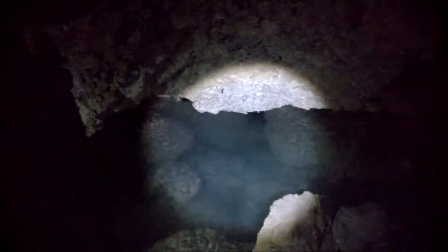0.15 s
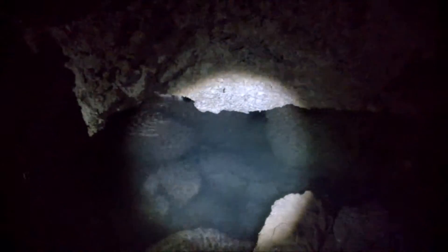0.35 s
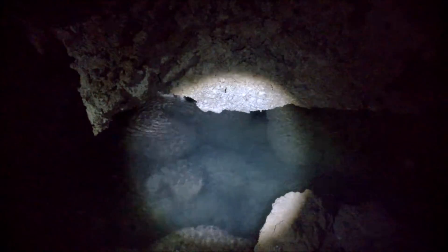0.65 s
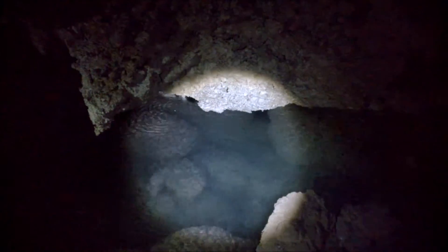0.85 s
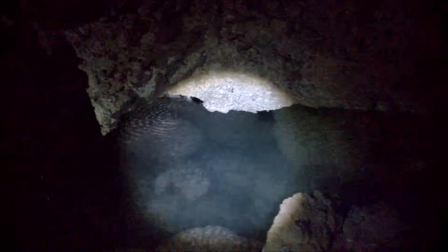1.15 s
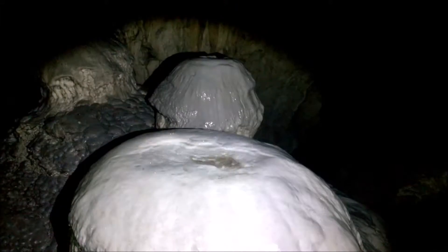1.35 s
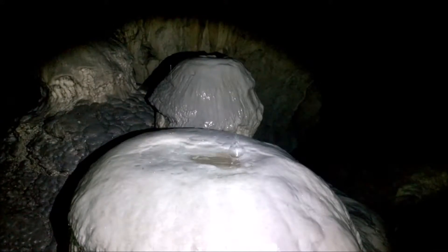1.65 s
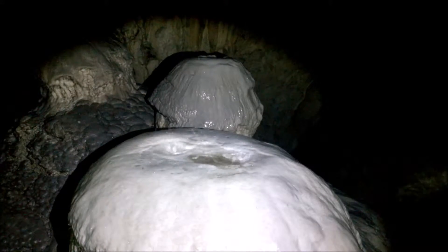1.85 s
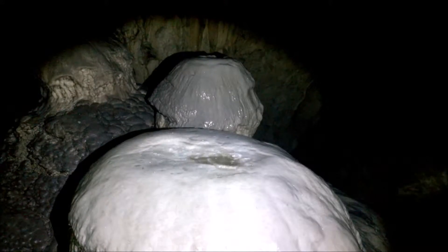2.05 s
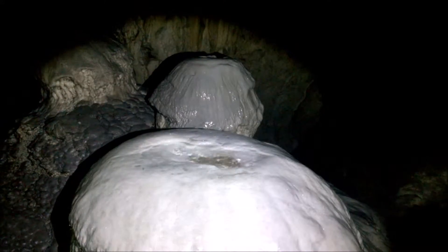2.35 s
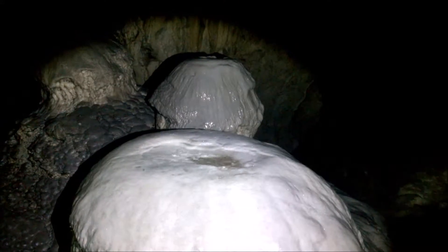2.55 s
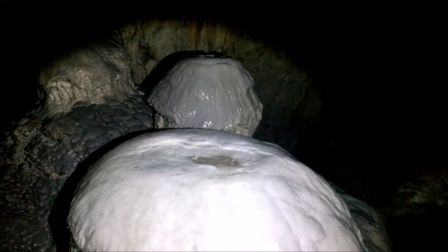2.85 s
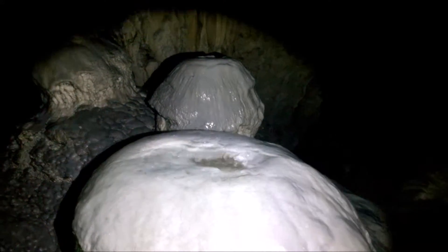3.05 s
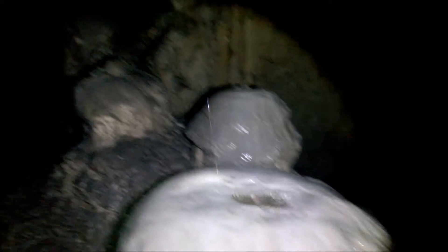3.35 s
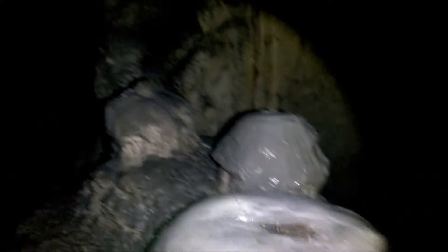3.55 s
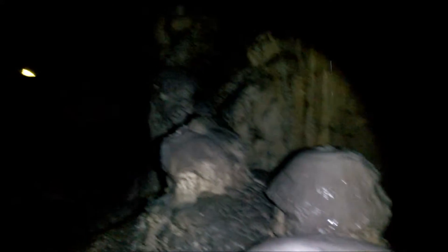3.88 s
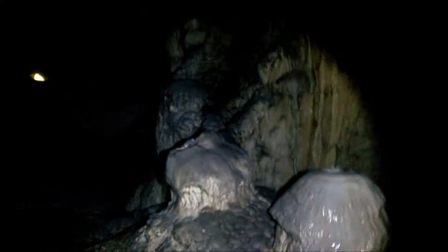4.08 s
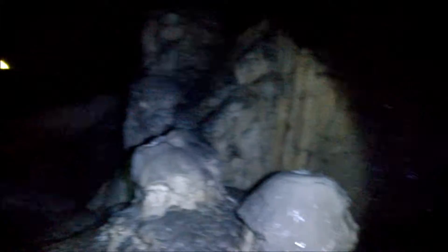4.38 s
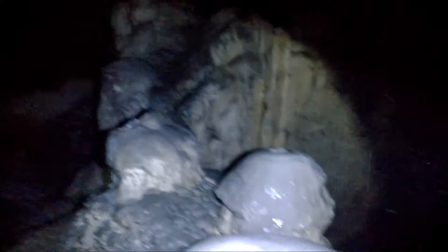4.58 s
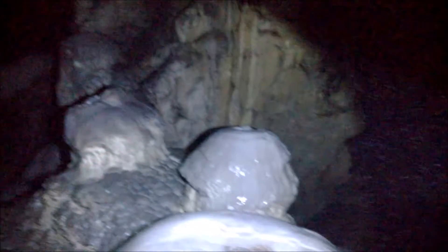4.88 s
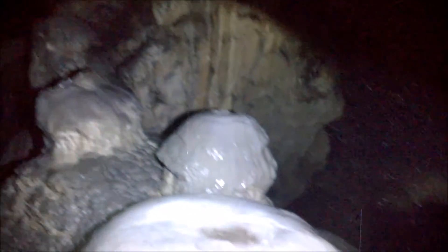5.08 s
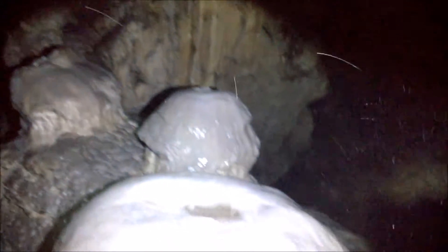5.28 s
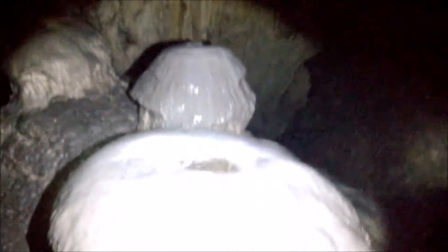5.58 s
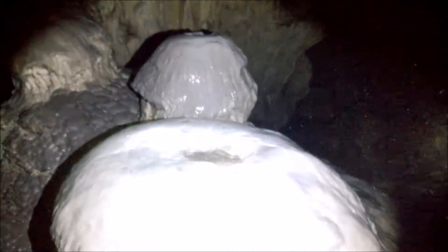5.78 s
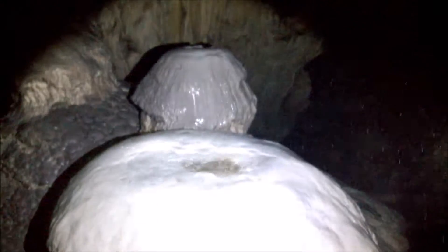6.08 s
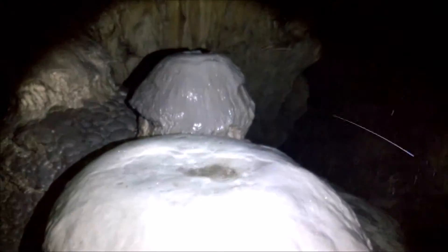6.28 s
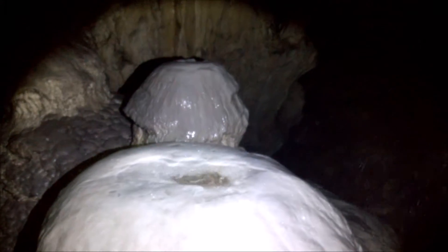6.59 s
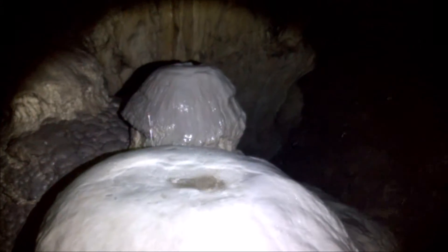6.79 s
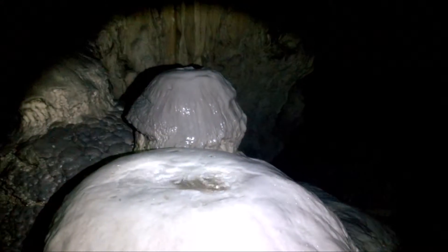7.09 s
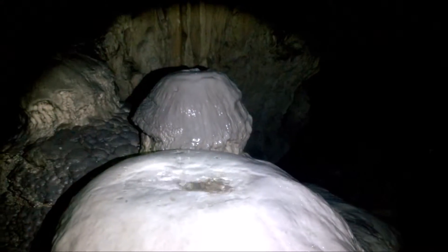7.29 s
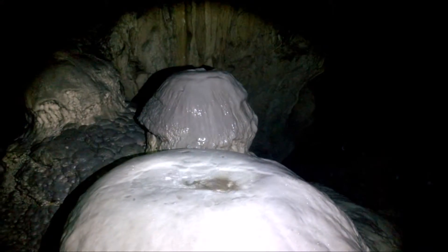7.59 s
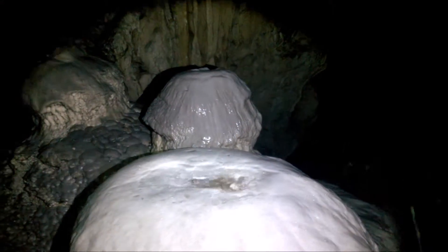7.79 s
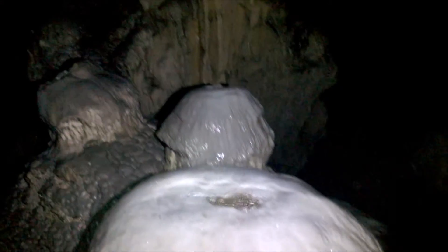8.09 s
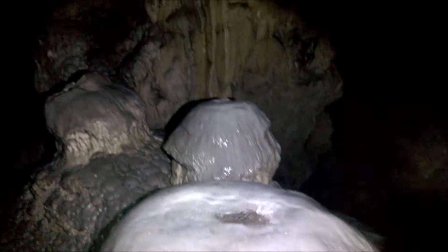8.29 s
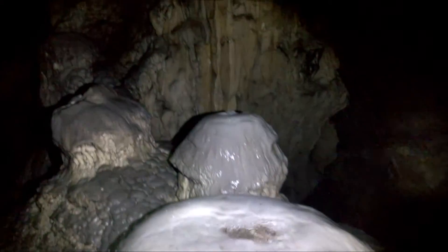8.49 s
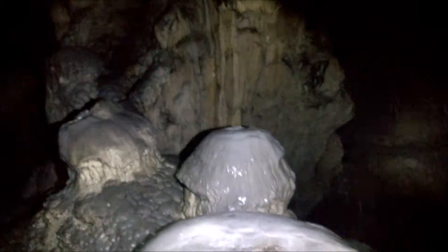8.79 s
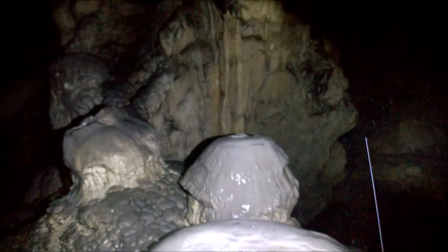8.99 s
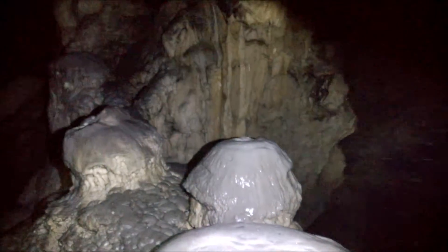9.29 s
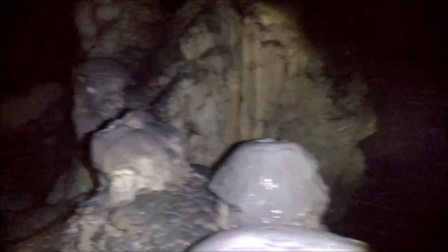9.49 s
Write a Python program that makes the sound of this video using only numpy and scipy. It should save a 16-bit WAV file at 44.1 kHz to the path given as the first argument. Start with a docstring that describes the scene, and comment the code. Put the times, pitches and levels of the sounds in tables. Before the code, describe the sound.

From 0 s a cave stream is already rushing over rocks: a fairly quiet, dense white-water hiss with fine crisp spray, gurgling bubbles and small trickles mostly blurred by short stone echoes. It grows about one decibel over the first half second, while a narrow treble band fills in. The water lies to the right of a handheld stereo pair, so the right side is much brighter and the left duller. At about 1.04 s the sound drops steeply into dead silence, until about 1.29 s. Then it returns abruptly, from beside a stalagmite, with noticeably softer spray and a rounder mid-range rush. It stays even to the end, around 9.5 s or later, with slight fluttering and a faintly heaving low rumble. Tiny splashing surges pass near 2.1 and 2.4 s, and a lower one near 5.4 s; a thin treble band fills in around 4 s.

```python
"""A stream rushes over rocks in a cave: white-water noise, countless ringing bubbles and fine spray.
The bubbles and spray are damped sines, mostly blurred by the echo of the stone walls.
It is heard first from beside a pool, then, after a moment of dead silence, from beside a stalagmite,
where the hiss is softer. The water lies to the right of the handheld microphone pair."""
import sys
import numpy as np
from scipy import signal
from scipy.fft import rfft, irfft, next_fast_len
from scipy.io import wavfile
from scipy.ndimage import uniform_filter1d, map_coordinates

SR = 44100
rng = np.random.default_rng(int(sys.argv[2]) if len(sys.argv) > 2 else 0)


def dump_mix(stems):
    """Bounce the given channels to the path in sys.argv[1] as a 16-bit WAV at rate SR."""
    frames = np.atleast_2d(stems).T  # one column per channel
    limited = np.clip(frames, -1, 1)  # hard clip at full scale
    pcm = np.round(limited * 32767).astype(np.int16)
    wavfile.write(sys.argv[1], SR, pcm)


N = 425105


def amp(db):
    """Decibels to gain."""
    return 10 ** (np.asarray(db) / 20)


def unit(x):
    """Scale to rms 1."""
    return x / np.sqrt(np.mean(x ** 2) + 1e-20)


def bell(x, centre, width):
    """A smooth bump of height 1."""
    return np.exp(-((x - centre) / width) ** 2)


def along(points, hz):
    """Each column after the frequency, read on a log axis."""
    f, *columns = np.transpose(points)
    return [np.interp(np.log(hz + 1), np.log(f + 1), column) for column in columns]


def filtered(x, response):
    """x times a complex response of frequency."""
    m = next_fast_len(N + SR // 2)
    hz = np.fft.rfftfreq(m, 1 / SR)
    return irfft(rfft(x, m) * response(hz), m)[..., :N]


def bubbles(count, low_hz, high_hz, cycles, spread_db, rise):
    """Damped sines at random moments; each climbs in pitch as its bubble nears the surface."""
    when, pitch, strength = rng.random((count, 3)).T[:, :, None]
    hz = low_hz + (high_hz - low_hz) * pitch ** 2  # big, low bubbles crowd closer in pitch
    k = np.arange(int(min(cycles * SR / low_hz, SR / 20)))  # samples, at most 1/20 s
    age = np.minimum(hz * k / SR / cycles, 1)  # 0 at birth, 1 when its cycles are spent
    gain = np.sqrt(hz) * amp(-spread_db * np.log(1 - .98 * strength))  # a few are much louder
    phase = 2 * np.pi * cycles * age * (1 + rise * age / 2)
    decay = np.exp(-np.log(100) * age) * (1 - age)
    ring = gain * np.sin(phase) * decay
    position = (when * N).astype(int) + k
    return unit(np.bincount(position.ravel(), ring.ravel(), N)[:N])


def cave(x, direct_db):
    """Two unrelated stone echoes of x, treble dying first, with a little direct sound on the right."""
    # how long the stone walls ring: pitch_hz, t60_s
    stone_decay = [(200, 0.91), (2000, 0.66), (12000, .25)]
    hz, t, z = signal.stft(rng.standard_normal((2, SR)), SR, nperseg=256)
    t60 = along(stone_decay, hz)[0][:, None]
    tail = signal.istft(z * amp(-60 * t / t60), SR, nperseg=256)[1]
    echo = unit(irfft(rfft(x) * rfft(tail, N), N))  # wraps round: the cave already rings at the start
    direct = np.array([np.zeros(N), x])
    return unit(echo + amp(direct_db) * direct)


def churn(x, patchy_db, flutter_db, smooth_hz):
    """The flow shifts between the rocks: bands swell and flutter, fine spray least; at times it surges."""
    # brief surges of splashing: centre_s, length_s, centre_hz, lift_db
    surges = [(2.14, .077, 2000, 4.5), (2.438, .055, 1300, 3), (5.4, 0.13, 620, 2.5)]
    hz, t, z = signal.stft(x, SR, nperseg=512)
    hz = hz[:, None]

    def field(bins, frames):
        """Random patches over pitch and time, rms 1."""
        noise = rng.standard_normal(z.shape[1:])
        return unit(uniform_filter1d(uniform_filter1d(noise, bins, 0), frames, 1))

    db = patchy_db * field(bins=5, frames=36) + flutter_db * field(bins=3, frames=5)
    db = db / np.sqrt(1 + hz / smooth_hz)  # full depth only in the bass
    for centre_s, length_s, centre_hz, lift_db in surges:
        band = bell(np.log2(hz + 1), np.log2(centre_hz), 0.44)  # width in octaves
        db = db + lift_db * bell(t, centre_s, length_s) * band
    return signal.istft(z * amp(db), SR, nperseg=512)[1][:, :N]


def heave(x, below_hz, depth_db, rate):
    """The deepest rumble comes and goes, following random points set rate times a second."""
    low = filtered(x, lambda hz: 1 / (1 + (hz / below_hz) ** 4))
    swell = map_coordinates(rng.standard_normal(400), [np.arange(N) * rate / SR], mode="mirror")
    return x + low * (unit(amp(depth_db * swell)) - 1)


def ports(x, spacing_m, alike, from_right):
    """Two microphone ports in a diffuse field share the bass; the right one hears it slightly earlier."""
    def likeness(hz):
        """The part of the right port's sound that the left port shares."""
        turn = 2 * np.pi * (hz + 1) * spacing_m / 343  # radians of phase across the pair
        even = np.sin(turn) / turn
        lean = (even - np.cos(turn)) / turn  # more sound arrives from one side
        return (min(alike, 1) * even - 1j * from_right * lean) * hz / (hz + 10)

    def own(hz):
        """The rest, which the left port hears alone."""
        return np.sqrt(np.clip(1 - abs(likeness(hz)) ** 2, 0, 1))

    left = filtered(x[1], likeness) + filtered(x[0], own)
    return np.array([left, x[1]])


def stream():
    """White water, with gurgling bubbles, nearer trickles and the ticks of spray landing on stone."""
    foam = rng.standard_normal((2, N))

    def rock():
        """Bubbles gurgling at one rock, with its own echo."""
        return cave(bubbles(count=2500, low_hz=294.5, high_hz=2805, cycles=10.0, spread_db=2.5, rise=0.17),
                    direct_db=-3)

    gurgle = unit(rock() + rock() + rock())
    # close by, single bubbles reach each port without the cave echo
    trickle = unit(np.array([
        bubbles(count=1100, low_hz=446.5, high_hz=3050, cycles=26, spread_db=2.5, rise=.12)
        for _ in "LR"]))
    spatter = cave(bubbles(count=16000, low_hz=2150, high_hz=13000, cycles=3.9, spread_db=3.5, rise=.1),
                   direct_db=-3.5)
    water = foam + amp(-13.5) * gurgle + amp(-19.5) * trickle + amp(-8) * spatter
    water = churn(water, patchy_db=0.33, flutter_db=1.06, smooth_hz=8000)
    water = heave(water, below_hz=99, depth_db=4.5, rate=9)
    return ports(water, spacing_m=0.15, alike=0.88, from_right=.65)


def heard_from(water, colour, roar_db, spray_db):
    """The water at one place: the low roar and the high spray each have their own loudness."""
    sound = filtered(water, lambda hz: amp(along(colour, hz)) * hz ** 2 / (hz ** 2 + 20 ** 2))
    roar = filtered(sound, lambda hz: 1 / (1 + (hz / 3000) ** 8))
    spray = sound - roar

    def levelled(x, db):
        """Set the level of the two ports' average."""
        return x / np.std(x.mean(0)) * amp(db)

    return levelled(roar, roar_db) + levelled(spray, spray_db)


def hollowed(x, centre_hz, octaves, depth_db, until_s, release_s):
    """A narrow band of the hiss is weak at first, then fills in."""
    band = filtered(x, lambda hz: bell(np.log2(hz + 1), np.log2(centre_hz), octaves))
    held = np.clip((until_s - np.arange(N) / SR) / release_s, 0, 1)
    return x + band * (amp(-depth_db * held) - 1)


def scene():
    """First the pool, a short silence, then the stalagmite."""
    # colour of the water beside the pool, relative level per Hz: pitch_hz, left_db, right_db
    by_pool = [(25, -23.5, -22.5), (90, -18, -14.5), (230, -11.5, -10), (300, -10.5, -10.5),
               (750, -3, -2.5), (1300, -4.5, -2), (1850, -6, -2.5), (2900, -9, -7), (4050, -12.5, -4.5),
               (4850, -17, -1), (5700, -17, -4.5), (8000, -19.5, -6.5), (9900, -24, -6),
               (15000, -33.5, -16)]
    # the same beside the stalagmite: pitch_hz, left_db, right_db
    by_stalagmite = [(20, -21, -15), (55, -13.5, -13), (122, -14.5, -13), (291, -9, -7.5), (700, -3, -2),
                     (1020, -3.5, -1.5), (2130, -6, 0.5), (2790, -7.5, -6), (3730, -12.0, -3.5),
                     (5140, -16, -3), (5530, -14.5, -4.5), (8400, -21.5, -8.5), (10360, -25, -9.5),
                     (15500, -40, -23)]
    # the dead silence between the two places: stop_s, resume_s
    silence = (1.041, 1.286)
    stop_s, resume_s = silence
    water, t = stream(), np.arange(N) / SR

    pool = heard_from(water, by_pool, roar_db=-39.0, spray_db=-35.6)
    pool = hollowed(pool, centre_hz=4770, octaves=.2, depth_db=2.0, until_s=0.55, release_s=.22)
    rise_db, rise_s = 1, 0.48  # the water grows louder at first, then holds
    grow = amp(-rise_db * np.maximum(1 - t / rise_s, 0))
    fade = amp(-300 * np.sqrt(np.maximum(t - stop_s, 0)))  # steep from the first instant

    stalagmite = heard_from(water, by_stalagmite, roar_db=-40.0, spray_db=-40.0)
    stalagmite = hollowed(stalagmite, centre_hz=5650, octaves=0.18, depth_db=2.0, until_s=4.3, release_s=.6)
    return pool * grow * fade + stalagmite * (t >= resume_s)


def record(dry):
    """The recorder keeps nothing above its band limit."""
    top_hz, slope_hz = 15700, 200  # middle and width of the cut
    return filtered(dry, lambda hz: np.clip((top_hz - hz) / slope_hz + .5, 0, 1))


dry = scene()
out = record(dry)
dump_mix(out)
```